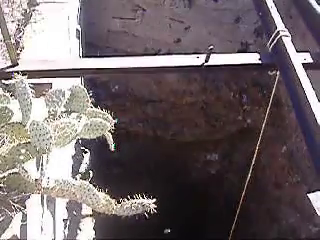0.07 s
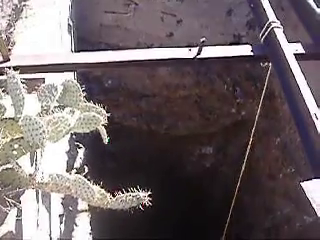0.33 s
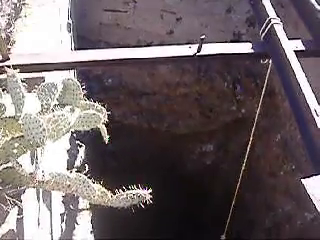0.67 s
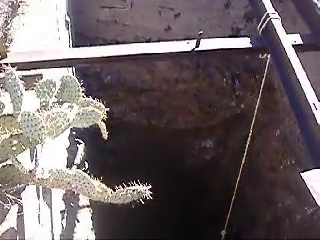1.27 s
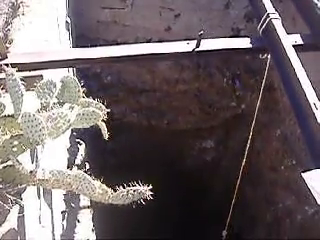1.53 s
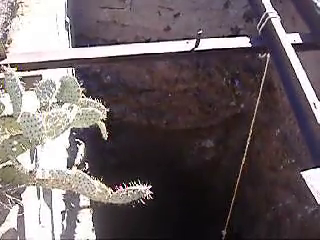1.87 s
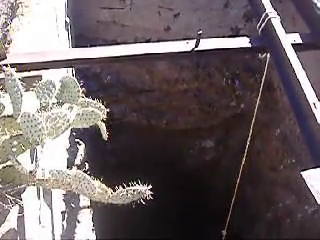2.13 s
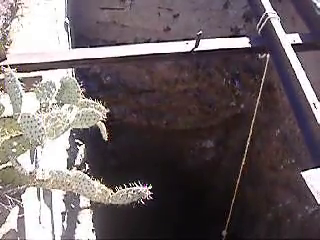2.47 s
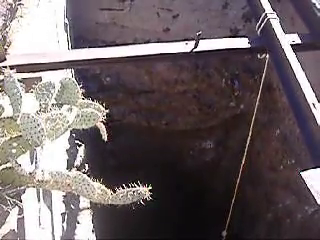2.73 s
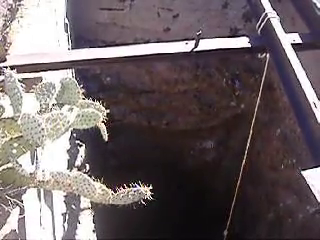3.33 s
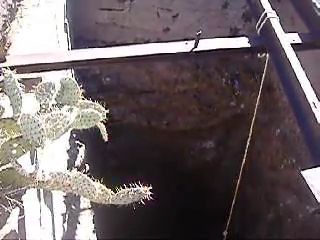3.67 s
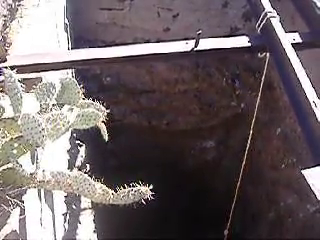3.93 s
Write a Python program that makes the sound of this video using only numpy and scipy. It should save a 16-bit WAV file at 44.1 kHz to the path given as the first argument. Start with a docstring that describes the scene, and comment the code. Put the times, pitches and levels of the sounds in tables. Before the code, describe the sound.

Low, gusty wind buffets a close microphone outdoors, sputtering at times. Halfway through, a stone strikes the wall of a deep shaft with a bright echoing crack, followed by weaker hits. A faint hiss and high whine continue underneath.

```python
"""At the rim of a desert mine shaft, a falling stone cracks against the rock far below. Each hit is a
sharp click with a short ring, and the walls throw it back as a bright, dense rush of echoes. Up close,
wind rumbles and thumps on a small camera's microphone, which saturates softly and sputters in the
strongest gusts. Under it all sit the camera's own hiss and whine and a few faint, distant peeps."""
import sys
import numpy as np
from scipy import signal
from scipy.fft import rfft, irfft
from scipy.io import wavfile
from scipy.ndimage import uniform_filter1d

SR = 44100
rng = np.random.default_rng(int(sys.argv[2]) if len(sys.argv) > 2 else 0)


def transcribe(u):
    """Save the signal u as a 16-bit wav file named by the first command-line argument.

    u: samples, shape (n,) or (channels, n), limited to [-1, 1]; the rate is SR.
    q: integer samples, one column per channel.
    """
    v = np.clip(np.atleast_2d(u).T, -1, 1)
    q = np.round(v * 32767).astype(np.int16)
    wavfile.write(sys.argv[1], SR, q)


N = 176400

# Fader moves of the wind: t/s, rumble level/dB, roar level/dB
WIND_LEVELS = [(0.0, -20.5, -35.0), (0.15, -27.5, -32.0), (0.22, -20.5, -30.0), (0.355, -30, -45),
               (0.411, -24.5, -42), (0.52, -18.5, -24.5), (0.6, -29, -45.5), (0.7, -26, -29.5),
               (0.86, -23.5, -34), (0.97, -23.5, -42.0), (1.02, -24.5, -47), (1.18, -23.5, -36.5),
               (1.27, -20, -31), (1.33, -27, -32), (1.38, -26, -26), (1.621, -19, -29), (1.68, -35, -47),
               (1.74, -30.5, -55), (1.8, -31, -49), (1.92, -39.5, -49), (1.965, -33, -29),
               (2.0, -22.5, -30), (2.04, -20.5, -30), (2.119, -23.5, -34.5), (2.23, -20.5, -32),
               (2.3, -36.5, -37), (2.35, -23.5, -32.5), (2.42, -24.5, -53), (2.49, -36.5, -46),
               (2.78, -33, -46), (2.9, -28.5, -36.5), (3.1, -25, -38), (3.22, -29.5, -41),
               (3.45, -26.5, -40.0), (3.6, -23.5, -38.0), (3.72, -30.5, -40), (3.79, -24, -39.5),
               (4.0, -27.5, -42)]
# EQ of the deep rumble: f/Hz, gain/dB
RUMBLE_EQ = [(10, -18.5), (22, -6.5), (35, 0.5), (55, -1.5), (90, -3.5), (130, -20.5), (250, -44.5),
             (600, -74.5)]
# EQ of the low roar: f/Hz, gain/dB
ROAR_EQ = [(50, -21), (100, 7.5), (160, -7), (240, -14.5), (400, -22), (800, -34), (1500, -58), (3000, -77)]
# EQ of the wind's rasp and the eddies' flutter: f/Hz, gain/dB
FLUTTER_EQ = [(150, -13), (300, 13), (430, 2.5), (650, -9), (1000, -15.5), (1500, -34), (2200, -30),
              (4000, -59), (7000, -86)]
# EQ of still air and microphone hiss: f/Hz, gain/dB
HISS_EQ = [(100, 12), (400, 10.5), (800, 6), (1500, 4.5), (2500, 2), (4500, 2), (6500, 1), (7100, 2.5),
           (7500, 3), (8100, -5), (8800, -25.5)]
# Tones of the camera's electronics: f/Hz, level/dB
WHINE_TONES = [(7012, -57), (7224, -77.5), (7289.7, -66), (7356, -66.5), (7422, -74.5), (7488.5, -76),
               (8644, -83), (8710, -85.5)]
# Eddies on the microphone: centre t/s, width/s, f/Hz, thump level before trim/dB, flutter level/dB
EDDIES = [(0.096, 0.02, 138, -15.5, -48), (0.202, 0.053, 113, -23, -42.5), (0.296, 0.038, 117, -20.5, -50),
          (0.393, 0.031, 144, -19, -39.5), (0.444, 0.016, 133, -22, -42), (0.53, 0.034, 135, -18.5, -37.5),
          (0.659, 0.021, 141.5, -17, -29.5), (0.685, 0.057, 142, -21, -35.5), (0.764, 0.015, 162, -15, -43),
          (0.815, 0.0096, 146, -15.5, -40), (0.858, 0.034, 143, -17, -44), (0.993, 0.015, 126, -12, -37),
          (1.093, 0.019, 116, -14.5, -41.5), (1.205, 0.012, 105, -23, -59),
          (1.256, 0.028, 140, -17.5, -39.5), (1.305, 0.012, 190, -18.5, -41), (1.368, 0.02, 155, -14, -42),
          (1.398, 0.018, 125, -12.5, -38), (1.443, 0.022, 145, -16, -45), (1.519, 0.019, 162, -14.5, -31.5),
          (1.559, 0.028, 146, -16, -34), (1.611, 0.035, 112, -25.5, -54), (1.646, 0.03, 167, -22.5, -44.5),
          (1.686, 0.014, 160, -18, -54), (1.722, 0.032, 129, -28, -63), (1.982, 0.017, 200, -15, -37.0),
          (1.997, 0.0068, 172, -13.5, -31), (2.025, 0.013, 118, -10.5, -43),
          (2.083, 0.046, 151, -15.5, -40), (2.146, 0.055, 135, -21.5, -51),
          (2.227, 0.073, 128.7, -23, -53.5), (2.416, 0.034, 115, -21, -50), (2.894, 0.037, 118, -21.0, -57),
          (3.008, 0.054, 123, -21, -39), (3.105, 0.028, 121, -16.5, -61), (3.324, 0.031, 125, -21.5, -52),
          (3.373, 0.011, 134, -19, -44.5), (3.506, 0.034, 144.6, -18.5, -51), (3.554, 0.034, 117, -22, -67),
          (3.618, 0.041, 114.3, -20, -64), (3.79, 0.02, 158, -20.5, -41), (3.854, 0.032, 124, -22.5, -57),
          (3.946, 0.04, 120, -26, -46)]
# EQ of an eddy's thump: f/eddy pitch, gain/dB
THUMP_EQ = [(.4, -14.5), (.75, 4), (1.2, 3.5), (2, -10.5), (4, -44.5), (12, -110)]
# Overload pops in the hardest gusts: t/s, level/dB, tilt/(dB per octave)
POP_CUES = [(.094, -38, -2), (.534, -30, 1), (.540, -31, 3), (.6285, -27, 0), (.640, -34, 2),
            (.657, -29, 0), (.675, -34, 0), (.696, -32, -3), (.744, -39, 0), (1.247, -30, -1.5),
            (1.262, -32, -3), (1.279, -35, -2), (1.367, -32, -2), (1.436, -34, -2), (1.484, -38, 0),
            (1.519, -26, -3), (1.557, -30, 0), (1.578, -38, 1), (1.591, -40, 2), (1.611, -36, -2),
            (1.654, -32, 1), (2.022, -32, -2), (2.109, -33, -2), (2.129, -32, -1), (3.512, -43, 5),
            (3.789, -38, -2)]
# EQ of a pop: f/Hz, gain/dB
POP_EQ = [(100, -9), (250, 3.5), (400, 8.5), (650, -4), (1000, -10.5), (1500, -19.5), (2100, -37.5),
          (3500, -53)]
# Stone hits: t/s, crack level/dB, echo level/dB, tilt/(dB per octave), low cut/Hz, ring before trim/dB
STONE_HITS = [(0.689, -42, -72, -1.5, 1010, -14), (1.9088, -15, -37, -2, 600, -1.5),
              (1.981, -28, -48, 0, 1800, -10), (2.090, -36, -60, 1, 2000, -10),
              (2.242, -40, -37.5, -0.5, 700, -14.5), (2.249, -29.5, -41, 12, 1500, -14.5),
              (2.291, -30, -42.5, -3, 1000, -7), (2.83, -33.5, -49, -3, 1200, 5),
              (2.8314, -24, -45, 8.5, 2850, 2), (2.861, -38, -55, 0, 3800, -1),
              (3.811, -37, -55.5, 10.5, 3000, -4), (3.869, -46, -60, 4, 3500, -1),
              (3.924, -47, -63, 8, 3000, -4), (3.939, -41, -67, -9, 2000, 6)]
# EQ of the direct crack: f/Hz, gain/dB
CRACK_EQ = [(300, -26), (900, -31), (1700, -10.5), (2800, -8), (4200, 5), (5200, 4), (5900, -0.5),
            (6800, 0), (7900, -10), (8700, -31.5)]
# Resonances of the stone: f/Hz, relative level/dB, T60/s
RING_MODES = [(3000, 1.5, .02), (3460, -10.5, .014), (4330, -3.5, 0.015), (4780, -3, .016),
              (5360, -5, 0.018), (7100, -2.5, 0.0064)]
# EQ of the shaft's echo: f/Hz, gain/dB
ECHO_EQ = [(300, -23.5), (1000, -11.5), (2100, -14), (3000, -6.5), (4200, 2), (5200, 0.5), (6200, -2),
           (7300, -1), (8200, -11), (8900, -30)]
# Distant peeps: centre t/s, width/s, f/Hz, level/dB
PEEP_CUES = [(.706, 0.012, 1664, -48), (0.978, 0.012, 1700, -53.5), (3.509, 0.009, 1670, -51),
             (3.879, 0.017, 1570, -55.5)]


def amp(db):
    """Decibels to gain."""
    return 10 ** (np.asarray(db) / 20)


def unit_rms(x):
    """Normalises to an rms of 1."""
    return x / np.sqrt(np.mean(x ** 2) + 1e-20)


def eq_db(eq, hz):
    """Reads an EQ curve on a log-frequency axis."""
    f, db = np.transpose(eq)
    return np.interp(np.log(hz + 1), np.log(f), db)


def add(mix, s, sound):
    """Drops a sound into the mix at s seconds."""
    at = round(s * SR)
    sound = sound[max(-at, 0):]
    part = mix[max(at, 0):][:len(sound)]
    part += sound[:len(part)]


def smooth(x, seconds):
    """Rounded moving average."""
    size = max(int(seconds * SR), 1)
    return uniform_filter1d(uniform_filter1d(x, size), size)


def wobble(seconds, size=N):
    """Smooth random modulation on the given time scale, rms 1."""
    return unit_rms(smooth(rng.standard_normal(size), seconds))


def noise(eq, size=N):
    """Noise through an EQ curve, rms 1."""
    gain = amp(eq_db(eq, np.fft.rfftfreq(size, 1 / SR)))
    return unit_rms(irfft(rfft(rng.standard_normal(size)) * gain, size))


def levelled(x, seconds):
    """Rides the gain to take the slow swells out of a noise."""
    return x / np.sqrt(abs(smooth(x * x, seconds)) + 1e-9)


def swell(t, width):
    """Bell-shaped fade in and out around t = 0."""
    return np.exp(-2 * (t / width) ** 2)


def click(eq, tilt_db, cut_hz, size=1024):
    """A minimum-phase click with EQ, tilt and low cut, unit energy."""
    hz = abs(np.fft.fftfreq(size, 1 / SR))
    floored_hz = np.maximum(hz, 300)
    gain = amp(eq_db(eq, hz) + tilt_db * np.log2(floored_hz)) / np.hypot(1, (cut_hz / floored_hz) ** 4)
    log_spectrum = np.conj(signal.hilbert(np.log(gain + 1e-6)))
    pulse = np.fft.ifft(np.exp(log_spectrum)).real
    return pulse / np.linalg.norm(pulse)


def wind():
    """A deep rumble and a lumpy low roar ride the breeze; strong wind adds a rasp."""
    t = np.arange(N) / SR
    times, rumble_levels, roar_levels = np.transpose(WIND_LEVELS)
    rumble_db, roar_db = np.interp(t, times, rumble_levels), np.interp(t, times, roar_levels)
    rasp_db = -37.5 + 1.76 * (roar_db + 22)  # grows faster than the roar
    rumble_lumps_db, roar_lumps_db, rasp_lumps_db = 1.8 * wobble(0.011), 3.5 * wobble(0.01), wobble(0.003)
    rumble = levelled(noise(RUMBLE_EQ), 0.04) * amp(rumble_db + rumble_lumps_db)
    roar = levelled(noise(ROAR_EQ), 0.019) * amp(roar_db + roar_lumps_db)
    rasp = noise(FLUTTER_EQ) * amp(rasp_db + rasp_lumps_db)
    return rumble + roar + rasp


def camera_noise(hiss_db=-52.5, jitter_hz=6):
    """A steady bed of hiss, with the thin, wavering whine of the electronics on top."""
    drift_hz = jitter_hz * wobble(0.011)
    whine = sum(amp(db) * np.sqrt(2) * np.sin(2 * np.pi * np.cumsum(hz + drift_hz) / SR)
                for hz, db in WHINE_TONES)
    return whine + amp(hiss_db) * noise(HISS_EQ)


def buffets(thump_trim_db=-3, flutter_max_s=0.035, size=32768):
    """Each eddy thumps the microphone with a few low pressure swings, fluttering on their peaks."""
    out, t = np.zeros(N), (np.arange(size) - size / 2) / SR
    for s, width, hz, thump_db, flutter_db in EDDIES:
        tuned_eq = [(hz * multiple, db) for multiple, db in THUMP_EQ]
        pressure = levelled(noise(tuned_eq, size), 0.009)
        thump = amp(thump_db + thump_trim_db) * pressure * swell(t, width)
        grit = unit_rms(noise(FLUTTER_EQ, size) * np.hypot(0.5, pressure))
        flutter = amp(flutter_db) * grit * swell(t, min(width, flutter_max_s))
        add(out, s + t[0], thump + flutter)
    return out


def mic_overload(pressure, ceiling_db=-10.5):
    """The microphone soft-clips pressure swings that near its ceiling."""
    return pressure / (1 + (pressure / amp(ceiling_db)) ** 4) ** (1 / 4)


def pops(rise_s=0.0018):
    """The sputter of an overloaded microphone: dull, soft-edged puffs with short ragged tails."""
    out, t = np.zeros(N), np.arange(1024) / SR
    for s, db, tilt_db in POP_CUES:
        burst = rng.standard_normal(len(t)) * t * np.exp(-t / rise_s)
        pop = signal.fftconvolve(burst, click(POP_EQ, tilt_db, cut_hz=0))
        pop *= np.sqrt(2 * rise_s * SR) / np.linalg.norm(pop)  # energy of rms 1 over two rise times
        add(out, s - rise_s, amp(db) * pop)
    return out


def stone_ring(ring_db, trim_db=-18):
    """A blow sets the stone's resonances ringing briefly; unit energy."""
    t = np.arange(2048) / SR
    ring = sum(amp(db - 60 * t / t60) * np.cos(2 * np.pi * hz * t) for hz, db, t60 in RING_MODES)
    blow = (t == 0) + amp(ring_db + trim_db) * ring / np.linalg.norm(ring)
    return blow / np.linalg.norm(blow)


def stone_in_shaft(attack_s=0.0011, hold_s=0.058, early_t60_s=0.21, late_t60_s=0.83, late_db=-9):
    """Each hit on the rock is a sharp crack; wall reflections pile up, hold and die away."""
    out, t = np.zeros(N), np.arange(SR) / SR
    release = np.maximum(t - hold_s, 0)
    decay = np.hypot(amp(-60 * release / early_t60_s), amp(late_db - 60 * release / late_t60_s))
    envelope = np.minimum(t / attack_s, 1) * decay
    crack_gain = np.sqrt(SR / 1000)  # energy of rms 1 over a millisecond
    for s, crack_db, echo_db, tilt_db, cut_hz, ring_db in STONE_HITS:
        taps = rng.standard_normal(SR)
        grain_db = 2.5 * wobble(0.0004, SR)
        reflections = unit_rms(taps * amp(grain_db)) * envelope
        hit = amp(echo_db) * signal.fftconvolve(reflections, click(ECHO_EQ, tilt_db, cut_hz))
        add(hit, 0, amp(crack_db) * crack_gain * click(CRACK_EQ, tilt_db, cut_hz))
        add(out, s, signal.fftconvolve(hit, stone_ring(ring_db)))
    return out


def peeps(spread_hz=120, size=4096):
    """Short, fuzzy whistles far off, each a narrow band of noise."""
    out, t = np.zeros(N), np.arange(size) / SR
    for s, width, hz, db in PEEP_CUES:
        band = np.exp(-((np.fft.rfftfreq(size, 1 / SR) - hz) / spread_hz) ** 2)
        fuzz = unit_rms(irfft(rfft(rng.standard_normal(size)) * band))
        add(out, s - t.mean(), amp(db) * levelled(fuzz, width) * swell(t - t.mean(), width))
    return out


def scene():
    """The mono mix at the rim; only the wind and its buffets are soft-clipped."""
    return (stone_in_shaft() + mic_overload(wind() + buffets()) + pops() + peeps() + camera_noise())[None]


def record(dry):
    """The camera's band limit: a steep high cut."""
    high_cut = signal.firwin(401, 8950, window=("kaiser", 9), fs=SR)
    return signal.oaconvolve(dry, high_cut[None], "same")


dry = scene()
out = record(dry)
transcribe(out)
```